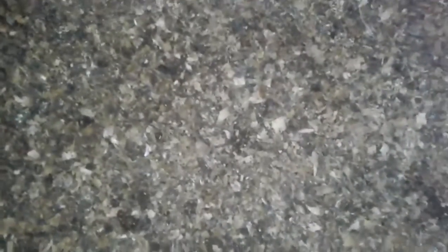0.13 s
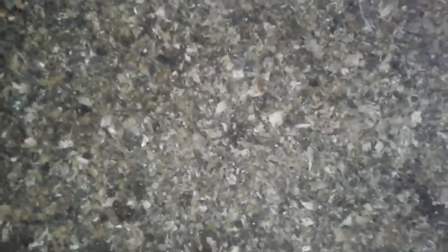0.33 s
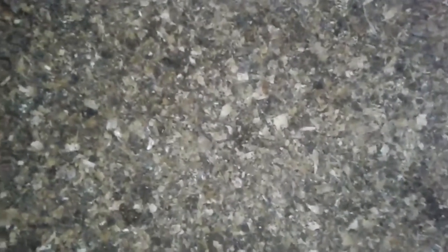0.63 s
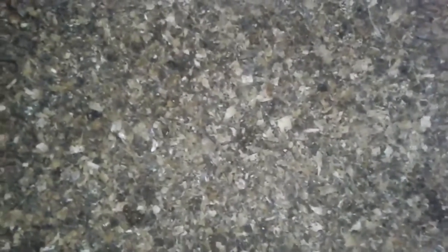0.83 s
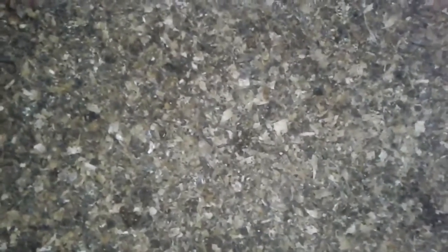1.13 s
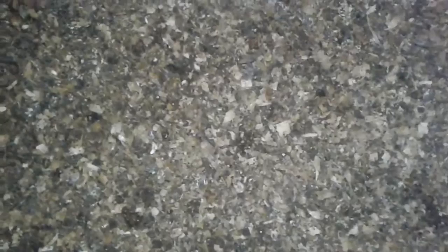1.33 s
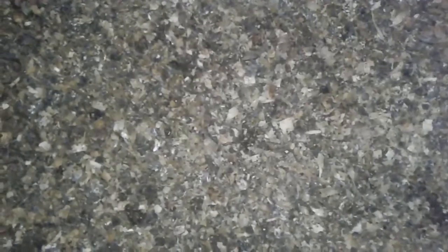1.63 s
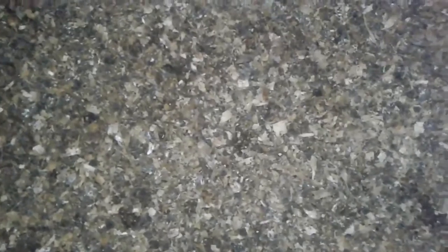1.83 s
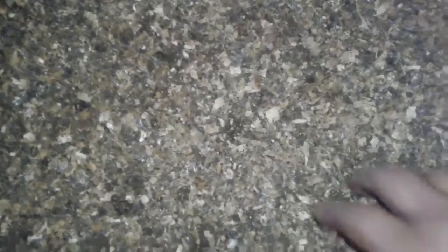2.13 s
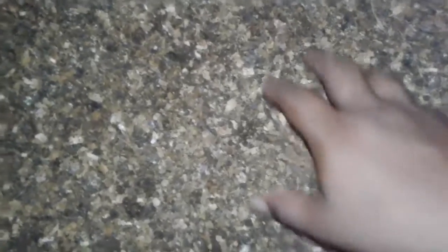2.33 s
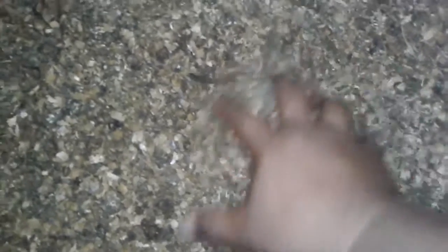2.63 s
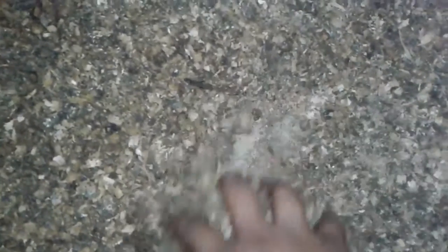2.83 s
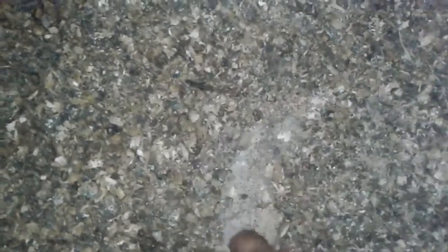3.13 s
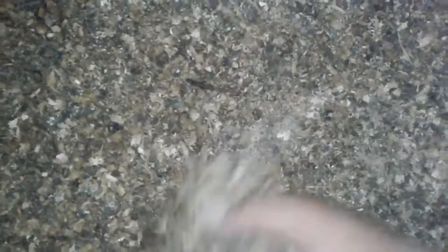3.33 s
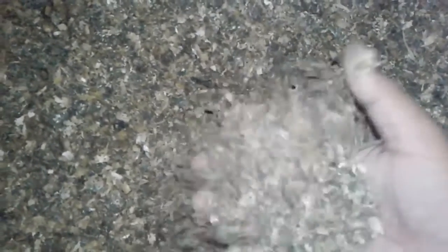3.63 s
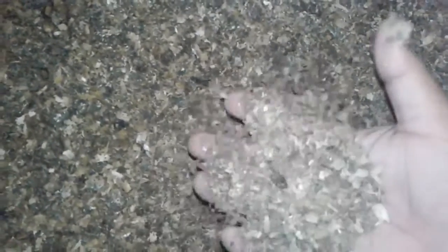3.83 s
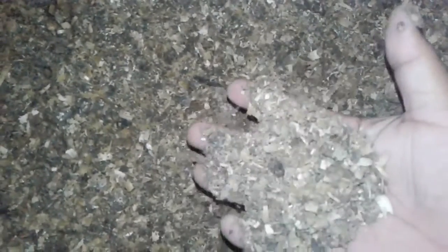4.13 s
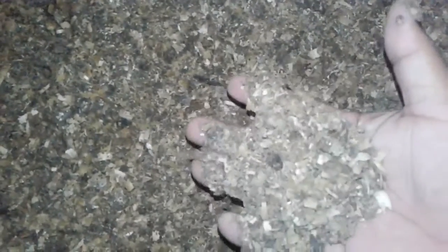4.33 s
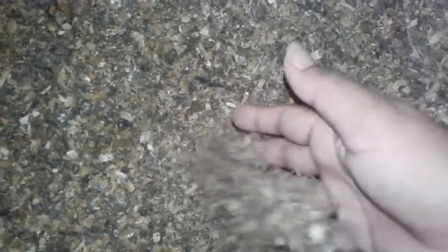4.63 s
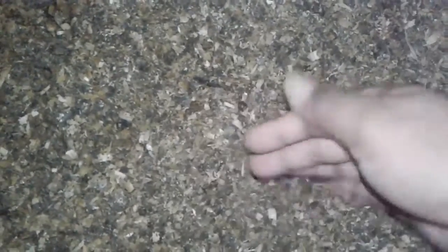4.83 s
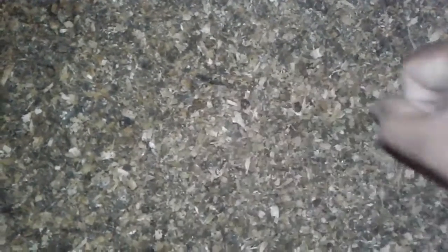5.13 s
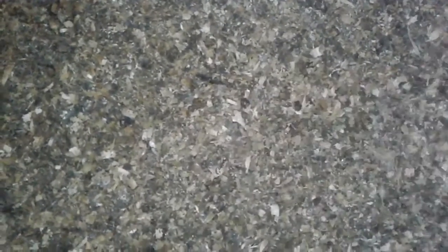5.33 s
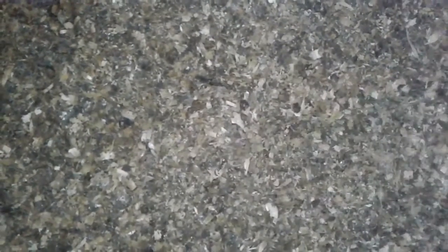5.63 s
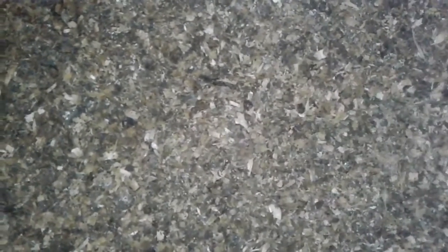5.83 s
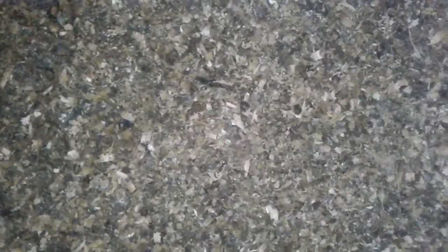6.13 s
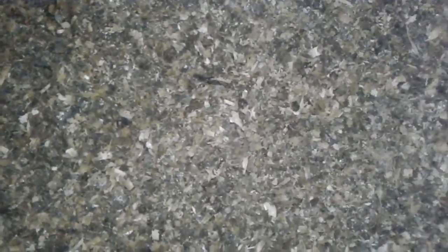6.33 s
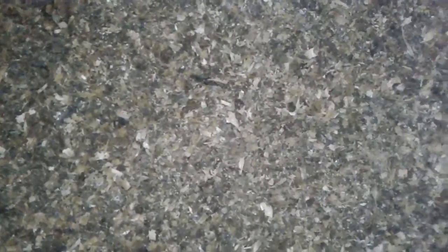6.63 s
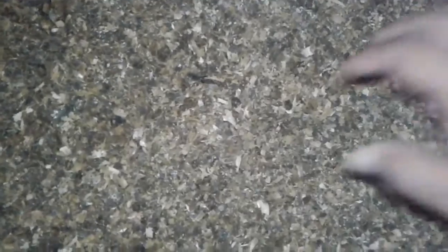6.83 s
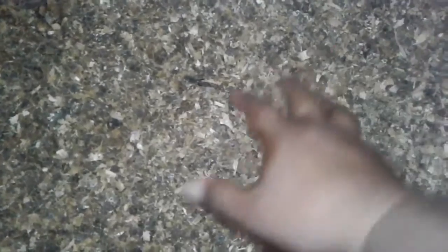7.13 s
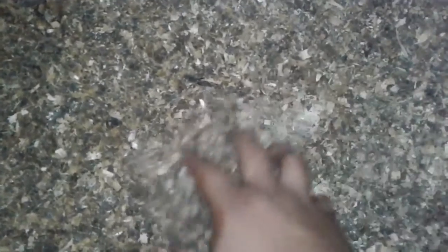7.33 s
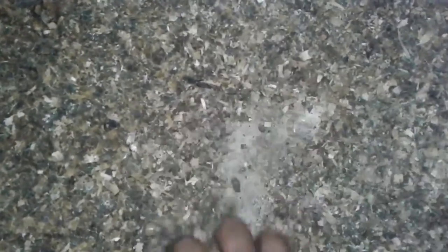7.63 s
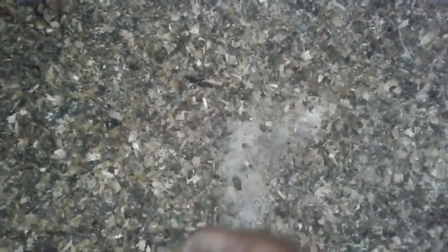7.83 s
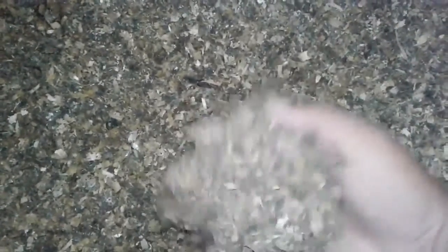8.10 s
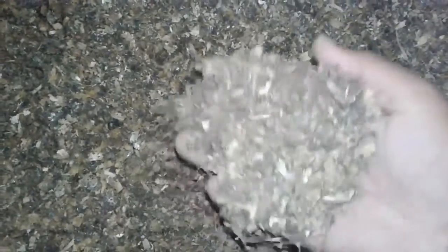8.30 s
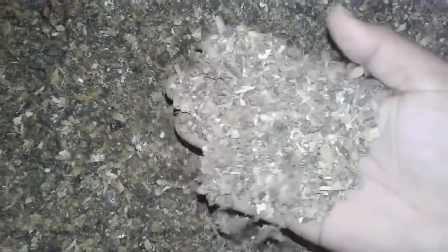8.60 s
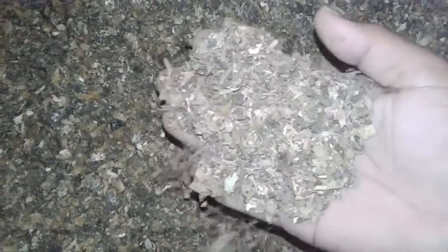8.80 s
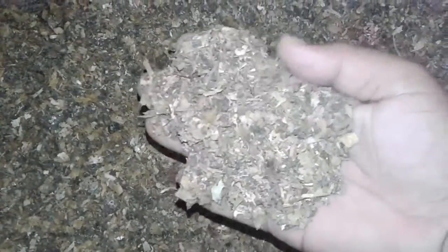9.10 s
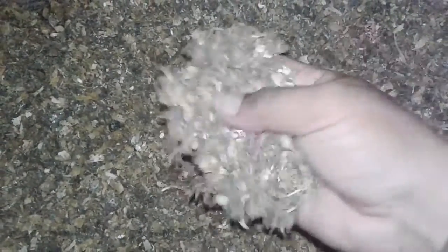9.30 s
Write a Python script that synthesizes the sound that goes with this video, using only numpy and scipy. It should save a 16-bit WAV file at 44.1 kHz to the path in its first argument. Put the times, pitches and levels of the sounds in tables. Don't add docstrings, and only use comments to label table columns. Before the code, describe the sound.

Deep pulsing fan drone fills a low shed, muffled chicks chirping and clucking through it, a distant flock half buried and litter lightly ticking.

```python
import sys
import numpy as np
from scipy import signal
from scipy.fft import rfft, irfft, next_fast_len
from scipy.io import wavfile
from scipy.ndimage import uniform_filter1d

SR = 44100
rng = np.random.default_rng(int(sys.argv[2]) if len(sys.argv) > 2 else 0)


def dump(signal):
    limited = np.clip(np.atleast_2d(signal).T, -1, 1)
    pcm = np.round(limited * 32767).astype(np.int16)
    wavfile.write(sys.argv[1], SR, pcm)


def volts(x):
    e = np.asarray(x, float) / 20
    return 10 ** e


N = 417186

# (time [s], blade rate [Hz], air flow [dB])
FAN_STATES = [(0.0, 43.6, -26.5), (0.47, 43.67, -25.5), (1.05, 40.83, -27), (1.24, 42.67, -26.5),
              (2.0, 40.7, -27), (2.77, 43.2, -27), (2.97, 39.51, -26), (3.21, 42.4, -26),
              (5.93, 42.3, -27.5), (6.03, 40.82, -27), (7.17, 40.5, -26.5), (7.61, 43.61, -26),
              (9.35, 43.64, -25.5), (9.46, 44.6, -26)]
# (start [s], top level [dB])
BLADE_SWELLS = [(-.1, -20.5), (0.101, -16), (.31, -20), (.53, -17), (.81, -17), (1.179, -19),
                (1.579, -22.5), (1.98, -19), (2.419, -16.5), (2.8, -22.5), (2.952, -19), (3.189, -16),
                (3.45, -17.5), (3.711, -17), (4.0, -16.5), (4.221, -17.5), (4.449, -16), (4.709, -18.5),
                (4.982, -16.5), (5.401, -20.5), (5.93, -22.5), (6.35, -19.5), (6.608, -24), (7.061, -21.5),
                (7.319, -19), (7.608, -25), (7.832, -18), (8.56, -15), (9.119, -20), (9.6, -17)]
# (time [s], level [dB])
SECOND_ORDER_SURGES = [(.26, -37), (.8, -31), (2.4, -21), (3.2, -24), (4.2, -24), (4.56, -24), (4.78, -19),
                       (5.43, -19), (5.62, -19.5), (6.05, -27), (7.25, -24), (7.72, -23.5), (8.6, -17),
                       (9.0, -36), (9.33, -26)]
# (frequency [Hz], density [dB per Hz])
AIR_ROAR = [(16, -44.5), (27, -16.5), (43, -10), (64, -6.5), (119, -2.5), (149, -7.5), (335, -22.5),
            (497, -18.5), (740, -20.5), (1030, -16), (1530, -28.5), (2360, -28.5), (3430, -54),
            (4500, -72.5)]
# (frequency [Hz], width [Hz], level [dB])
HOUSING_RINGS = [(121, 12, -30), (160, 10, -37), (206, 12, -41), (312, 10, -43), (492, 14, -46),
                 (585, 7, -46), (667, 9, -47), (706, 7, -49), (769, 14, -36.5), (793, 11, -38.5),
                 (910, 22, -43), (965, 12, -42), (996, 10, -43), (1051, 9, -43.5), (1081, 8, -45.5),
                 (1185, 16, -46)]
# (time [s], length [s], start [Hz], end [Hz],
# level [dB])
FALLING_CRIES = [(1.94, .035, 2230, 1750, -32), (2.395, .045, 3130, 1960, -30),
                 (2.685, .035, 2250, 1740, -29), (3.085, .075, 2650, 1900, -28),
                 (3.296, .036, 2850, 1800, -30), (3.38, .02, 2700, 2230, -32),
                 (3.728, .065, 2450, 1880, -27), (4.04, .025, 2720, 2260, -32),
                 (7.25, .015, 3250, 2780, -37), (8.512, .05, 4000, 2200, -30),
                 (8.553, .075, 2200, 1720, -25), (8.947, .038, 2850, 1650, -24),
                 (8.975, .022, 1620, 2200, -25), (8.965, .03, 2550, 2000, -32), (.44, .04, 2700, 2350, -31),
                 (4.235, .03, 2100, 1800, -27), (4.048, .04, 1850, 1480, -29), (2.55, .04, 2380, 2030, -35)]
# (time [s], length [s], middle pitch [Hz], level [dB])
SAGGING_PEEPS = [(.66, .035, 2060, -36), (1.29, .04, 1810, -36), (1.53, .035, 2440, -31),
                 (2.52, .025, 1910, -35), (3.04, .02, 2130, -35), (.04, .025, 2300, -35),
                 (3.26, .015, 2300, -33), (3.485, .02, 2510, -34), (3.535, .025, 2020, -30),
                 (3.825, .025, 2210, -32), (3.835, .025, 1670, -35), (3.87, .025, 2130, -32),
                 (3.895, .035, 1745, -32), (7.92, .025, 2000, -33), (4.44, .025, 2190, -30),
                 (4.595, .02, 1960, -36), (4.795, .025, 2890, -33), (4.885, .02, 3840, -40),
                 (5.995, .025, 1840, -32), (6.152, .028, 1890, -29), (6.303, .032, 1880, -28),
                 (7.42, .05, 1850, -35), (7.605, .02, 2190, -32), (7.85, .02, 2210, -31),
                 (8.1, .04, 1860, -32), (8.14, .025, 1930, -32), (8.27, .02, 1910, -33),
                 (8.355, .02, 3570, -35), (8.895, .02, 1950, -32), (9.39, .025, 2600, -34)]
# (time [s], length [s], top pitch [Hz], level [dB])
ARCHED_CLUCKS = [(3.278, .026, 2900, -28), (3.453, .045, 2930, -29), (3.68, .04, 2250, -31),
                 (1.67, .02, 1450, -32), (4.165, .02, 1450, -30), (4.37, .035, 1380, -28),
                 (4.762, .068, 1480, -23), (4.915, .025, 1380, -33), (5.16, .025, 1470, -35),
                 (5.415, .03, 1460, -36), (6.82, .05, 1410, -35), (8.375, .022, 1450, -28),
                 (8.575, .025, 1870, -30), (8.615, .025, 1530, -32), (8.85, .025, 1560, -36)]
# (time [s], length [s], top pitch [Hz], warble rate [per s], level [dB])
WARBLED_TRILLS = [
    (3.64, .09, 2200, 45, -32),
    (4.25, .045, 2250, 50, -29),
    (4.23, .04, 4400, 45, -41),
    (4.955, .1, 2200, 50, -32),
    (7.878, .085, 3200, 38, -25),
    (7.885, .08, 2980, 58, -28),
    (7.985, .105, 2980, 50, -30),
    (8.59, .225, 2530, 41.5, -27.5),
]
# (frequency [Hz], gain [dB])
BIRD_MUFFLING = [(600, 0.5), (2200, -3.5), (2600, -9), (3000, -16), (3500, -21), (4000, -24), (5000, -24),
                 (6000, -43), (16000, -50)]
# (time [s], peak level [dB])
LITTER_TICKS = [(1.6097, -46), (1.8287, -46), (2.3141, -51), (2.4483, -48), (2.6843, -44), (2.818, -48),
                (2.9537, -50), (3.2705, -47), (3.4002, -56), (3.4131, -48), (3.5957, -51), (3.7549, -51),
                (3.9948, -54), (4.0093, -50), (4.146, -46), (4.2098, -47), (4.2757, -47), (4.2946, -42),
                (4.362, -39), (4.4523, -48), (4.579, -51), (6.6877, -52), (6.8194, -47), (7.2235, -54),
                (7.7308, -51), (7.7887, -48), (8.5091, -52), (9.0354, -42), (9.1137, -43), (9.2274, -48)]
# (time [s], length [s], level [dB])
LITTER_RUSTLES = [
    (2.2, .3, -66),
    (4.198, 0.17, -56),
    (8.953, .2, -67),
]
# (frequency [Hz], density [dB per Hz])
MICROPHONE_HISS = [(2500, -24), (3500, -10), (4200, -1.5), (5000, -1), (6300, -3.5), (8500, 1), (11500, -4),
                   (13000, -15), (15500, -15)]
# (frequency [Hz], level [dB])
ELECTRONIC_WHINES = [(7234, -84), (10837, -88), (10897, -87), (14509, -90)]
# (frequency [Hz], density [dB per Hz])
CHANNEL_DIFFERENCE = [(40, 1), (230, -15.5), (300, -4.5), (730, -8), (2180, -4), (2880, -10), (3500, -28),
                      (4200, -27), (6000, -27.5), (9000, -26.5), (12000, -28), (15500, -31)]
# (frequency [Hz], share [0-1])
TREBLE_DROPOUTS = [(3700, 0), (4400, .14), (6300, .08), (7500, .01), (11000, .015), (12500, .33),
                   (13800, .7), (14600, .6), (15500, .92)]


def evened(x):
    return x / np.sqrt(np.mean(x ** 2) + 1e-20)


def read(points, hz):
    f, value = np.transpose(points)
    return np.interp(np.log(hz + 1), np.log(f + 1), value)


def curve(rows, t):
    s, *columns = np.transpose(rows)
    return [np.interp(t, s, column) for column in columns]


def add(mix, s, sound):
    part = mix[round(s * SR):][:len(sound)]
    part += sound[:len(part)]


def coloured(x, points):
    size = next_fast_len(len(x))
    gain = volts(read(points, np.fft.rfftfreq(size, 1 / SR)))
    return irfft(rfft(x, size) * gain, size)[:len(x)]


def slow(seconds):
    steps = np.arange(N // 100 + 2) * 100 / SR
    rates = np.linspace(.02, 1, 40)[:, None] / seconds
    wave = np.sin(2 * np.pi * (rates * steps + rng.random(rates.shape))).sum(0)
    return evened(np.interp(np.arange(N) / SR, steps, wave))


def blade_tones(t, blade_hz):
    turns = 2 * np.pi * np.cumsum(blade_hz) / SR
    starts, top_db = np.transpose(BLADE_SWELLS)
    place = np.interp(t, starts, np.arange(len(starts)))
    never_quite_cancel, swell_shape = 0.12, .7
    arch = never_quite_cancel + (1 - never_quite_cancel) * abs(np.sin(np.pi * place)) ** swell_shape
    swell = uniform_filter1d(arch * volts(top_db[place.astype(int)]), size=1500)

    second_turns = 1.95 * turns
    width_hz, surge_s = 5., 0.052
    a, b = slow(1 / width_hz), slow(1 / width_hz)
    wavering = a * np.sin(second_turns) + b * np.cos(second_turns)
    second = evened(swell ** 0.1) * wavering
    surge = sum(volts(db) * np.exp(-((t - s) / surge_s) ** 2) for s, db in SECOND_ORDER_SURGES)
    tones = swell * np.sin(turns) + surge * np.sin(second_turns)
    return np.sqrt(2) * tones + volts(-28.5) * second


def moving_air(flow_db):
    size = next_fast_len(N)
    f = np.fft.rfftfreq(size, 1 / SR)
    roar = volts(read(AIR_ROAR, f))
    roar *= volts(-21) / np.sqrt(np.sum(roar ** 2))
    bells = [(db, np.exp(-((f - hz) / width) ** 2)) for hz, width, db in HOUSING_RINGS]
    ringing = sum(volts(db) ** 2 * bell / bell.sum() for db, bell in bells)
    shape = np.sqrt(roar ** 2 + ringing)
    z = rfft(rng.standard_normal(size)) * shape * np.sqrt(size / 2)

    low_share = np.clip(2 - f / 200, 0, 1)
    rumble = irfft(z * low_share, size)[:N]
    rush = irfft(z * (1 - low_share), size)[:N]
    gust_db = flow_db + 26
    buffet_db = 1 * slow(.15)
    return volts(0.27 * gust_db + buffet_db) * rumble + volts(0.88 * gust_db) * rush


def fans():
    t = np.arange(N) / SR
    blade_hz, flow_db = curve(FAN_STATES, t)
    return blade_tones(t, blade_hz) + moving_air(flow_db)


def whistle(hz, db, edge, unsteady, flutter, octave_db=-22):
    chance = rng.standard_normal((2, len(hz)))
    wander, uneven = (evened(uniform_filter1d(v, size=130)) for v in chance)
    turns = 2 * np.pi * np.cumsum(hz * (1 + unsteady * wander)) / SR
    tone = np.sin(turns) + volts(octave_db) * np.sin(2 * turns)
    fade = signal.windows.tukey(len(hz), np.clip(edge, 0, 1))
    return np.sqrt(2) * volts(db) * (1 + flutter * uneven) * tone * fade


def peep(length, start_hz, mid_hz, end_hz, db):
    u = np.linspace(0, 1, round(length * SR))
    hz = start_hz * (1 - u) * (1 - 2 * u) + 4 * mid_hz * u * (1 - u) + end_hz * u * (2 * u - 1)
    return whistle(hz, db + .6, edge=.45, unsteady=.007, flutter=.15)


def trill(length, top_hz, rate, db, sag=0.066):
    u = np.linspace(0, 1, round(length * SR))
    dips = np.sin(np.pi * (rate * length * u + .13)) ** 4
    depth = 5.8 / rate
    return whistle(top_hz * (1 - sag * u - depth * dips), db, edge=.25, unsteady=.014, flutter=.25)


def near_birds():
    near = np.zeros(N)
    for s, length, start, end, db in FALLING_CRIES:
        middle = start + .64 * (end - start)
        add(near, s, peep(length, start, middle, end, db))
    sag = .075
    for s, length, hz, db in SAGGING_PEEPS:
        add(near, s, peep(length, hz * (1 + sag), hz, hz * (1 - sag), db))
    rise, fall = .04, .14
    for s, length, hz, db in ARCHED_CLUCKS:
        add(near, s, peep(length, hz * (1 - rise), hz, hz * (1 - fall), db))
    for s, *row in WARBLED_TRILLS:
        add(near, s, trill(*row))
    return near


def far_flock(per_s=22, floor_db=-46):
    far = np.zeros(N)
    for s, length, hz, bend, fall, size in rng.random((round(per_s * N / SR), 6)):
        top = 1500 + 1500 * hz
        middle = top * (.97 - .12 * fall + .05 * bend)
        end = top * (.95 - 0.17 * fall)
        add(far, s * N / SR, peep(.018 + 0.056 * length, top, middle, end, floor_db + 6 * size))
    return far


def shed(x, t60=0.11, gap_s=0.0042):
    t = np.arange(SR // 2) / SR
    tail = rng.standard_normal(len(t)) * volts(-60 * t / t60) * (t > gap_s)
    return signal.oaconvolve(x, tail / np.linalg.norm(tail))[:N]


def chickens():
    near, far = near_birds(), far_flock()
    tail = shed(volts(-6) * near + volts(-2) * far)
    return coloured(near + far + tail, BIRD_MUFFLING)


def litter():
    out, t = np.zeros(N), np.arange(300) / SR
    for s, db in LITTER_TICKS:
        add(out, s, volts(db + 2.5) * rng.standard_normal(len(t)) * np.exp(-t / 0.0016))
    for s, length, db in LITTER_RUSTLES:
        count = round(length * SR)
        grains = rng.standard_normal(count) * (rng.random(count) < 900 / SR)
        add(out, s, volts(db) * evened(grains) * np.hanning(count))
    return signal.sosfilt(signal.butter(2, [3800, 11500], "band", fs=SR, output="sos"), out)


def scene():
    return np.tile(fans() + chickens() + litter(), (2, 1))


def patchy_noise(points, patchy_db, flicker_db, size=1024):
    frames, hz = 4 * N // size + 5, np.fft.rfftfreq(size, 1 / SR)
    a, b, patches = rng.standard_normal((frames, len(hz), 3)).T
    patches = uniform_filter1d(patches, size=16, axis=0)
    patches = evened(uniform_filter1d(patches, size=6, axis=1))
    flicker = evened(uniform_filter1d(rng.standard_normal(frames), size=5))
    level_db = read(points, hz)[:, None] + patchy_db * patches + flicker_db * flicker
    z = (a + 1j * b) * volts(level_db)
    return evened(signal.istft(z, nperseg=size, noverlap=3 * size // 4)[1][:N])


def electronics():
    t = np.arange(N) / SR
    settle_s, settle_width_s = 2.35, .15
    settled = .5 + .5 * np.tanh((t - settle_s) / settle_width_s)
    hiss = volts(-59.5 - 4.5 * settled) * patchy_noise(MICROPHONE_HISS, patchy_db=1.2, flicker_db=.9)
    return hiss + sum(np.sqrt(2) * volts(db) * np.sin(2 * np.pi * hz * t) for hz, db in ELECTRONIC_WHINES)


def dropped(x, depth_db=-40, size=1024, count=16):
    hz, _, z = signal.stft(x, SR, nperseg=size, noverlap=size // 2)
    chance = rng.standard_normal((z.shape[2], len(hz) // count + 1)).T
    chance = uniform_filter1d(chance + 1.4 * chance[:1], size=4, axis=1)
    treble = abs(z[0, (hz > 5000) & (hz < 11000)]).mean(0)
    loudness = treble / uniform_filter1d(treble, size=80)
    chance = chance + 3 * np.maximum(loudness - 1.15, 0)
    rank = np.argsort(np.argsort(chance, axis=1), axis=1) / z.shape[2]
    shut = np.repeat(rank, count, axis=0)[:len(hz)] < read(TREBLE_DROPOUTS, hz)[:, None]
    return signal.istft(z * volts(depth_db * shut), SR, nperseg=size, noverlap=size // 2)[1][:, :N]


def low_pass(x):
    return signal.sosfilt(signal.butter(12, 15740, fs=SR, output="sos"), x)


def record(dry):
    apart = volts(-52.5) * patchy_noise(CHANNEL_DIFFERENCE, patchy_db=5.0, flicker_db=2.5)
    heard = dropped(dry + electronics() + np.array([apart, -apart]))
    return low_pass(heard)


dry = scene()
out = record(dry)
dump(out)
```